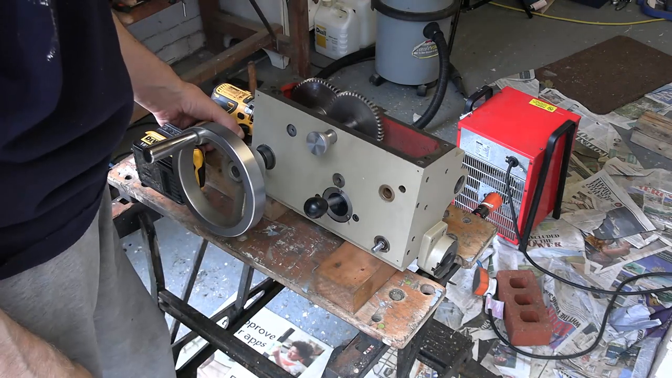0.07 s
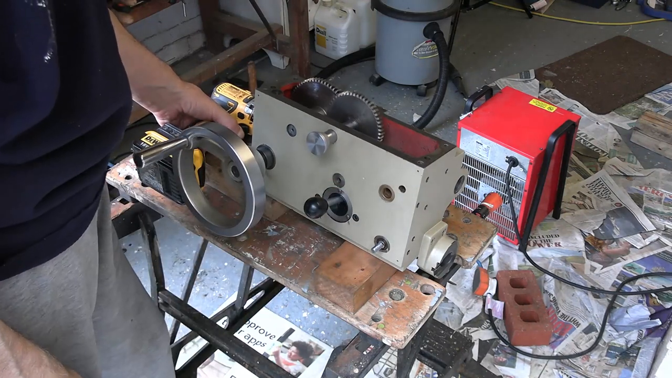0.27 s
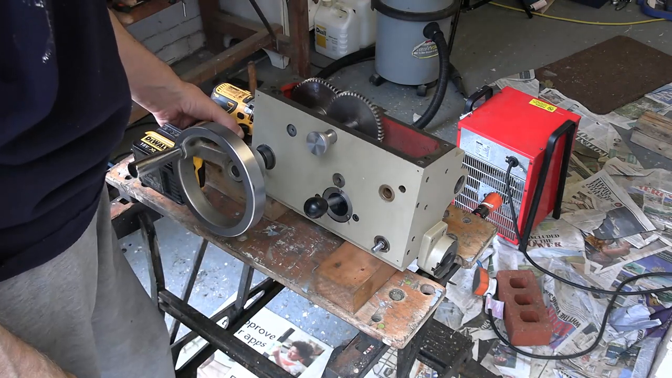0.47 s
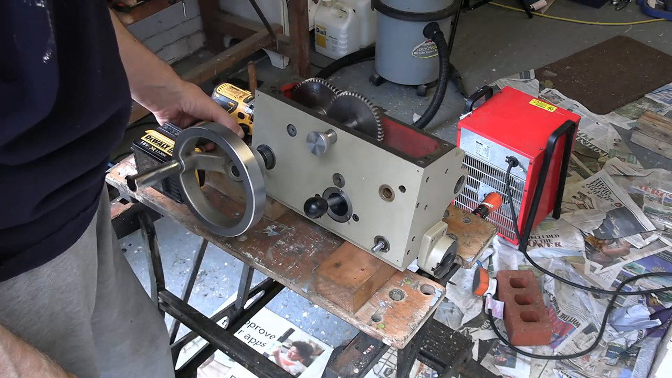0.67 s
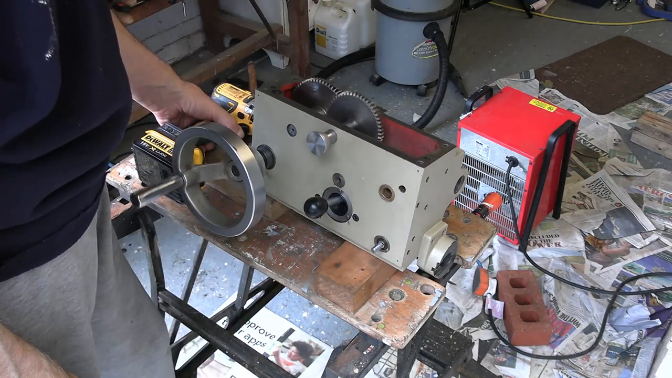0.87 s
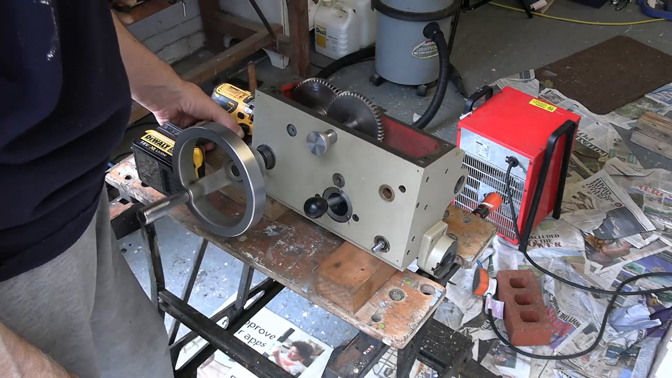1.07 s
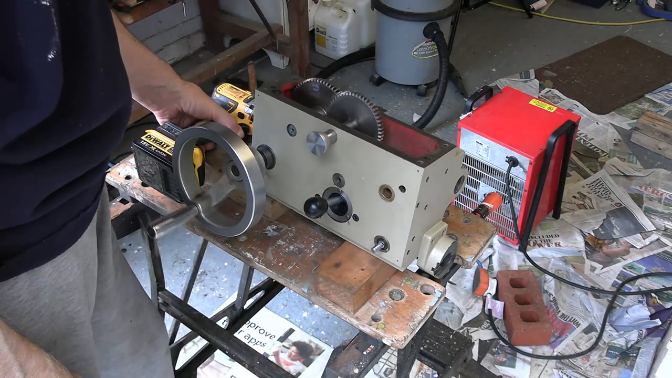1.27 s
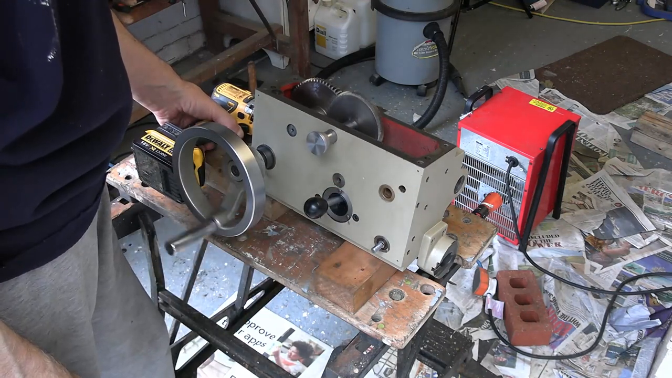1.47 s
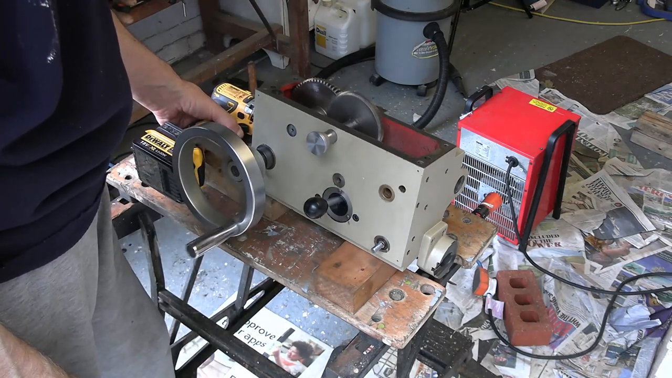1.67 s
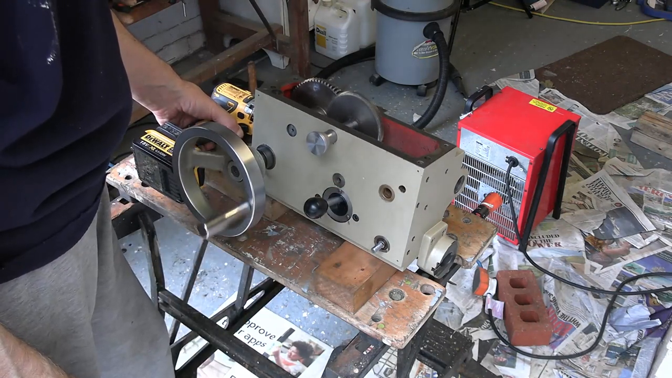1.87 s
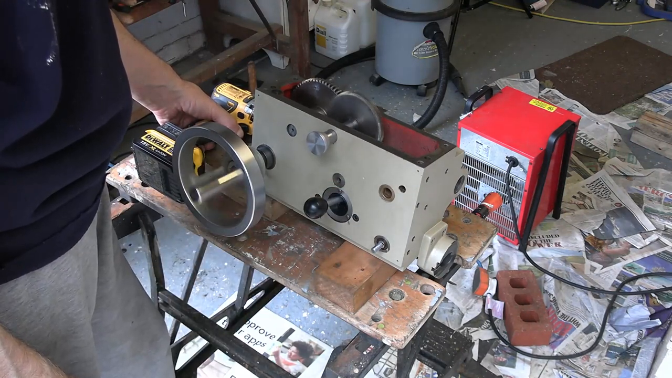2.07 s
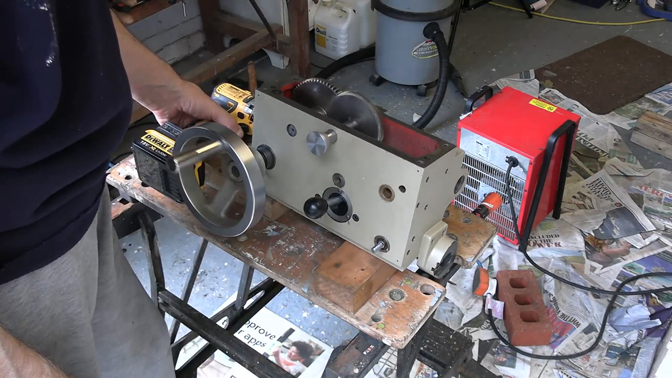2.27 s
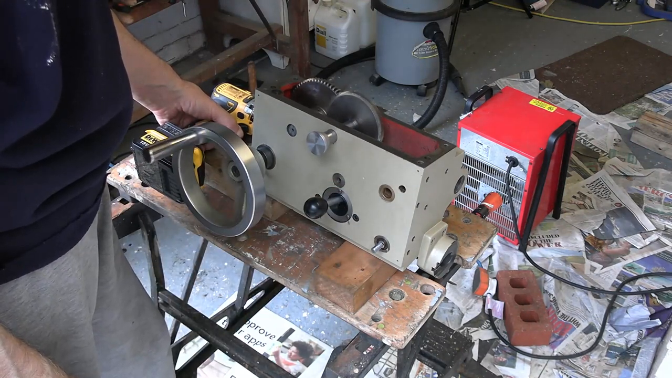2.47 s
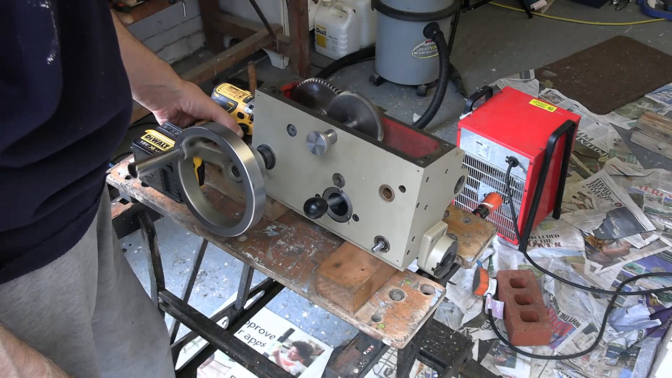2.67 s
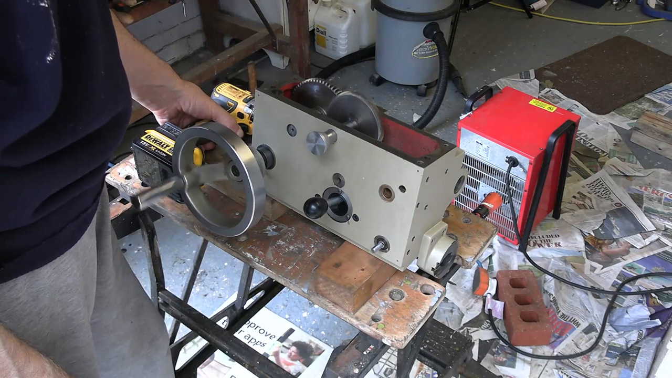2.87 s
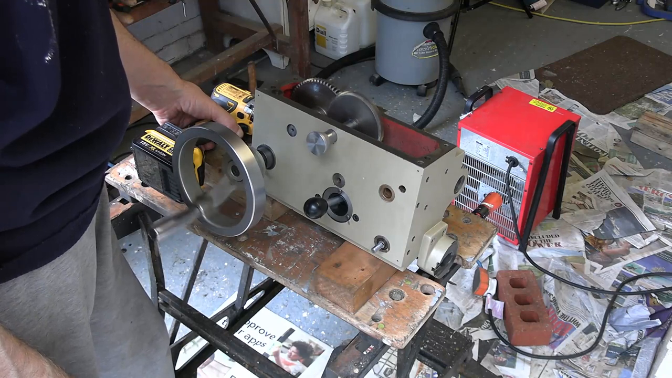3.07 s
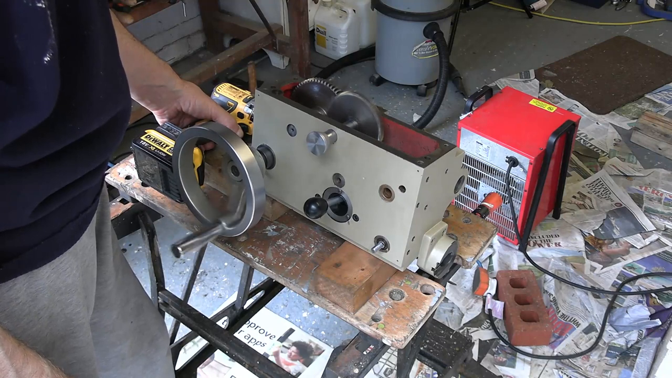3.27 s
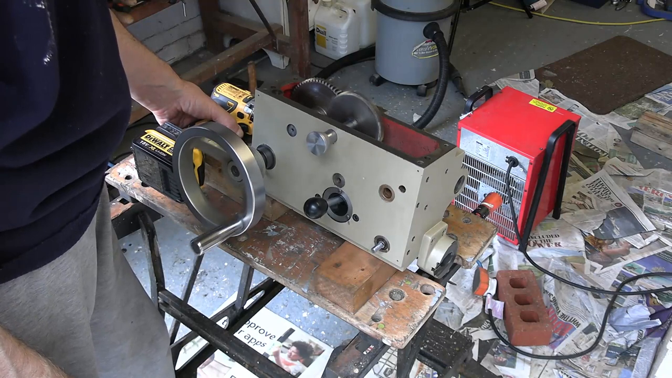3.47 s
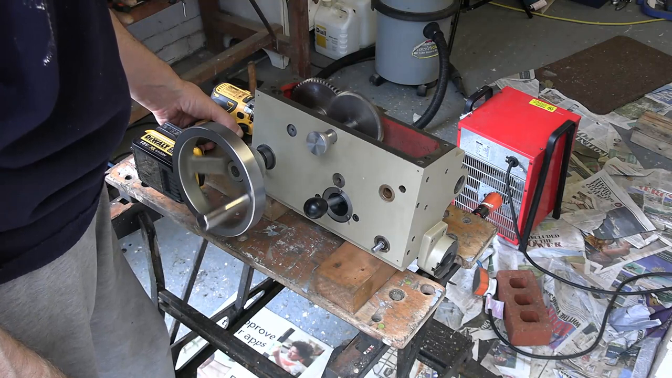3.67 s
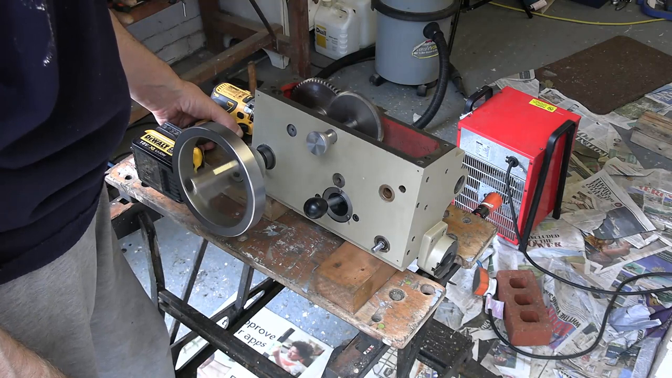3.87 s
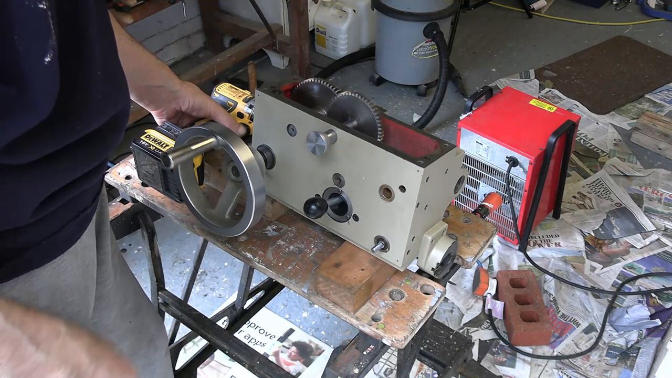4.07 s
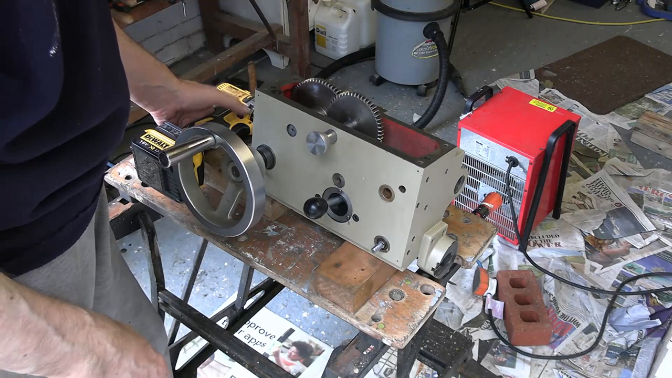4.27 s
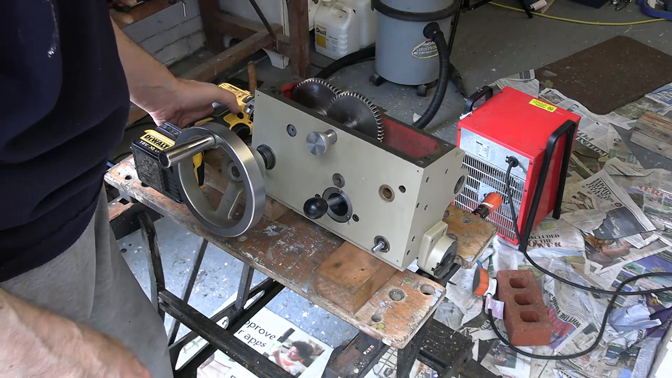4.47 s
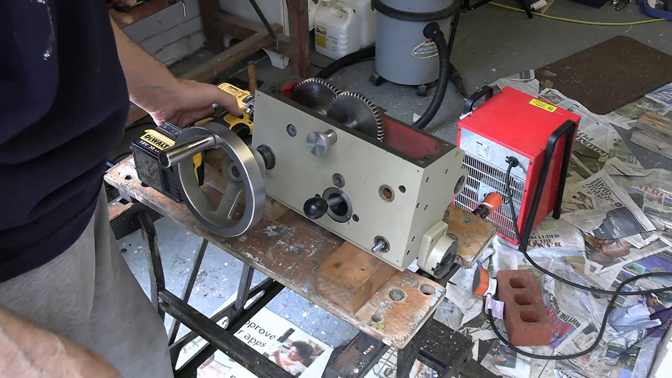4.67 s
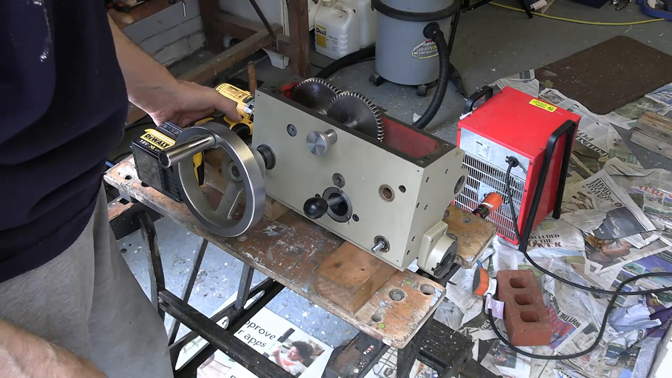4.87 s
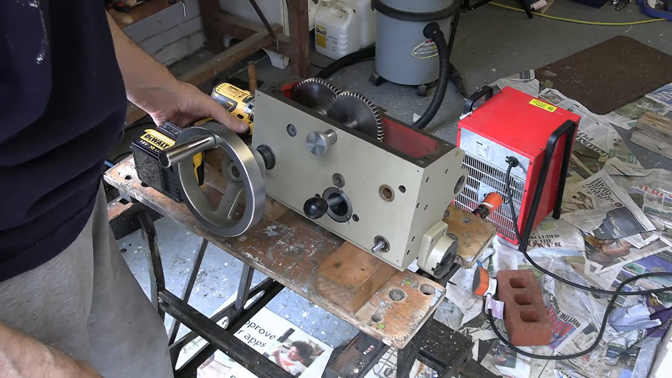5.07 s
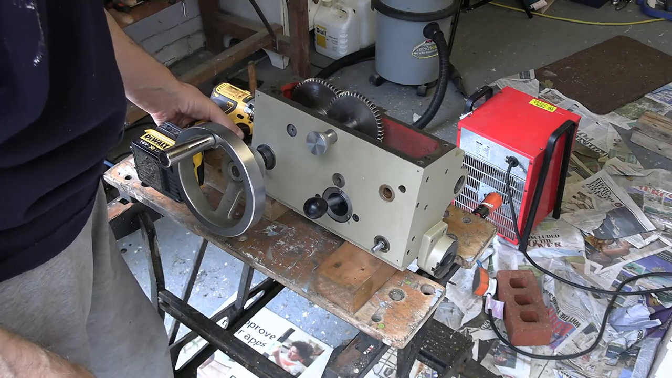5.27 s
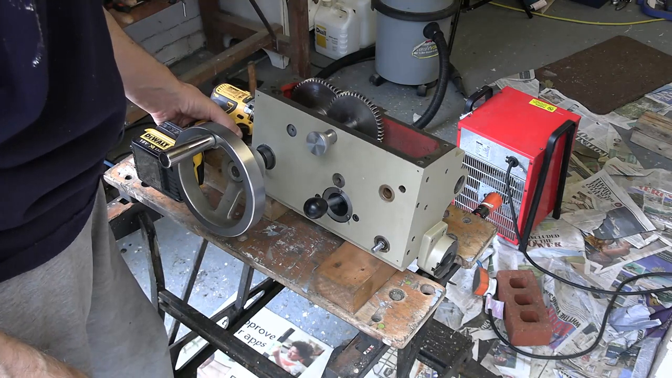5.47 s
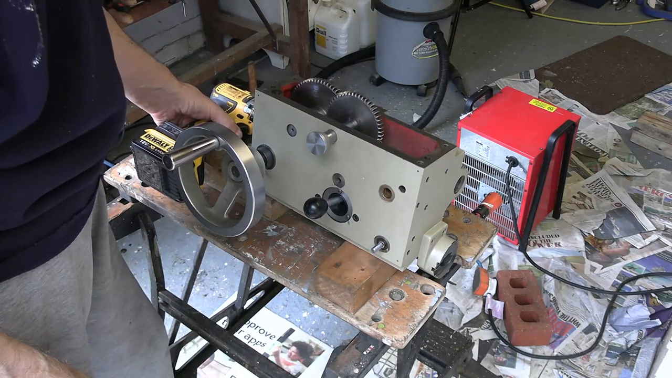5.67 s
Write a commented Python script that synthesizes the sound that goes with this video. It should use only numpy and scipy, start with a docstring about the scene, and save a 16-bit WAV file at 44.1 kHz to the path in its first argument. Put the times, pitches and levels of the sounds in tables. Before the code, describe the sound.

Motor whine and dense rattling gears run slow, then fast, brake to a clacking halt; a switch snaps and the drill starts again.

```python
"""A cordless drill turns the shaft of an open steel gearbox on a workshop bench, first slowly, then at twice the speed.
Random tooth impacts, filtered by case resonances, make the clatter; rotor-locked sines make the whine above it.
The motor brakes and the gears knock as noise bursts with ringing wheel modes; then a switch on the drill clicks.
The drill starts again, and further knocks take up the play of the gears.
A dull hush of filtered noise lies under it all, and a small room rings faintly around the machine."""
import sys
import numpy as np
from scipy import signal
from scipy.fft import rfft, irfft, next_fast_len
from scipy.io import wavfile
from scipy.ndimage import uniform_filter1d

SR = 44100
rng = np.random.default_rng(int(sys.argv[2]) if len(sys.argv) > 2 else 0)


def dump(signal):
    """Clip the signal to [-1, 1] and save it as 16-bit WAV at the path in sys.argv[1]."""
    limited = np.clip(np.atleast_2d(signal).T, -1, 1)
    pcm = np.round(limited * 32767).astype(np.int16)
    wavfile.write(sys.argv[1], SR, pcm)


N = 252252
TIME = np.arange(N) / SR
# the trigger is let go, the shaft stands still, the trigger is pulled again (s)
RELEASE_S, STOP_S, RESTART_S = 4.085, 4.2, 5.54
# cycles of the whine to a turn of the rotor; its pitch at full speed and on the restart, before wander (Hz)
WHINE_ORDER, FAST_HZ, RESTART_HZ = 8, 3246, 1410
# All levels in dB are relative; the scene's mix and gain control come after them.


def from_db(db):
    """Logarithmic level: decibels become an amplitude ratio."""
    return 10 ** (np.asarray(db) / 20)


def rms_one(x):
    """Power normalization: scale to unit mean square."""
    return x / np.sqrt(np.mean(x ** 2) + 1e-20)


def since(s):
    """Elapsed time: seconds gone by after a moment, zero before it."""
    return np.maximum(TIME - s, 0)


def in_time(rows):
    """Linear interpolation: read a curve at every sample."""
    return np.interp(TIME, *np.transpose(rows))


def at_hz(points, hz):
    """Logarithmic frequency axis: read a spectrum between its points."""
    points = np.array(points)
    return np.interp(np.log(np.maximum(hz, 1)), np.log(points[:, 0]), points[:, 1])


def colour(x, spectrum):
    """Linear filtering: multiply by a smooth spectrum, falling away below its first point."""
    size = next_fast_len(len(x) + 4096)
    hz = np.arange(size // 2 + 1) * SR / size
    rumble_cut = np.minimum(hz / spectrum[0][0], 1) ** 2
    gain = from_db(at_hz(spectrum, hz)) * rumble_cut
    return irfft(rfft(x, size) * gain, size)[:len(x)]


def drift(rate_hz):
    """Low-passed noise: slow chance of spread 1, from two equal poles at rate_hz."""
    step = 40  # samples between drawn values
    r = np.exp(-2 * np.pi * rate_hz * step / SR)
    noise = rng.standard_normal(N // step + 2002)
    slow = signal.lfilter([1], [1, -2 * r, r * r], noise)[2000:]
    return np.interp(np.arange(N) / step, np.arange(len(slow)), rms_one(slow))


def resonate(x, hz, width_hz):
    """Damped oscillator: a resonance with gain 1 at its peak."""
    r = np.exp(-np.pi * width_hz / SR)
    zeros = np.array([1, 0, -1]) * (1 - r * r) / 2
    poles = [1, -2 * r * np.cos(2 * np.pi * hz / SR), r * r]
    return signal.lfilter(zeros, poles, x + 1e-18)


def near_reflections(x, t60_s=0.041):
    """Early scattering: case walls and bench spread each impact briefly, which ripples the spectrum."""
    t = TIME[:SR // 20]
    scatter = rng.standard_normal(len(t)) * from_db(-60 * t / t60_s) * (t > .001)
    return signal.fftconvolve(x, scatter / np.linalg.norm(scatter))[:N]


# Decay of the room; columns: pitch_hz [Hz], t60_s [s]
ROOM_DECAY = [(200, 0.1), (800, 0.33), (2000, 0.35), (5000, 0.34), (9000, 0.29)]


def room_tail(x, gap_s=.012):
    """Diffuse reverberation: dense reflections die exponentially, band by band."""
    t, tail = TIME[:SR // 2], 0
    edges = np.geomspace(80, 12000, 9)
    for low, high in zip(edges, edges[1:]):
        band_pass = signal.butter(2, [low, high], "band", fs=SR, output="sos")
        band = signal.sosfilt(band_pass, rng.standard_normal(len(t)))
        t60_s = at_hz(ROOM_DECAY, np.sqrt(low * high))
        tail = tail + band * from_db(-60 * t / t60_s)
    tail = tail * (t > gap_s)
    # level the tail by its energy over the filled bandwidth
    return signal.fftconvolve(x, tail / np.sqrt(np.sum(tail ** 2) * SR / 2 / edges[-1]))[:N]


# Width of the machine's sound; columns: pitch_hz [Hz], level_db of the side signal [dB]
MACHINE_WIDTH = [(60, -26.5), (200, -24.5), (400, -31.5), (740, -10.5), (1500, -1.5), (4000, 1), (9000, 4)]


def in_room(x, wet_db, side_db):
    """Spatial coherence: two close microphones agree in the bass; reflections part them in the treble."""
    wet = from_db(wet_db)
    mid = x + wet * room_tail(x)
    reflections = near_reflections(x, t60_s=0.06) + wet * 2 * room_tail(x)
    side = from_db(side_db) * colour(reflections, MACHINE_WIDTH)
    return np.array([mid + side, mid - side]) / np.sqrt(1 + wet ** 2)


# Spectrum of the workshop's quiet; columns: pitch_hz [Hz], level_db [dB per Hz]
HUSH_COLOUR = [(25, -24), (60, -8), (110, -3), (180, 0), (300, -3), (450, -1), (750, -5), (1300, -9),
               (2500, -13), (4200, -18), (6500, -23), (8300, -28), (9300, -40)]
# Width of the hush; columns: pitch_hz [Hz], level_db of the side signal [dB]
HUSH_SIDE = [(60, -22.5), (210, -31.5), (740, -6.5), (2610, 1.5), (9170, -9.5)]


def workshop(hush_db=-56):
    """Stationary noise: a steady, dull hush with independent mid and side."""
    def hush():
        return from_db(hush_db) * rms_one(colour(rng.standard_normal(N), HUSH_COLOUR))
    mid = hush()
    side = colour(hush(), HUSH_SIDE)
    return np.array([mid + side, mid - side])


def blows(events, spectrum):
    """Impulsive excitation: each blow is a crack of dense, quickly dying vibration."""
    envelope = 0
    for start_s, level_db, t60_s in events:
        decays = np.clip((TIME - start_s) / max(t60_s, .003), 0, 3)
        envelope = envelope + from_db(level_db - 60 * decays) * (TIME >= start_s)
    noise = rng.standard_normal(N)
    return colour(envelope * noise, spectrum) / np.std(colour(noise, spectrum))


# The switch slides and snaps home; columns: start_s [s], level_db [dB], t60_s [s]
SWITCH_SNAPS = [(4.762, -39.5, 0.018), (4.7895, -23.5, 0.02), (4.7945, -34, 0.02), (4.800, -38, 0.02),
                (4.8078, -21, 0.014), (4.809, -18.5, 0.015), (4.8122, -30, 0.019), (4.8175, -20, 0.018)]
# Spectrum of the switch; columns: pitch_hz [Hz], level_db [dB per Hz]
SNAP_COLOUR = [(120, -48), (200, -22), (450, -8), (920, 2), (1310, -3), (1700, -1), (2490, -4), (3500, -7),
               (4200, -5), (5000, -7), (7700, -9), (9300, -16)]
SWITCH_S = SWITCH_SNAPS[0][0]


def switch_click(switch_db=-8):
    """Snap action: a train of short cracks as the switch moves over."""
    return from_db(switch_db) * blows(SWITCH_SNAPS, SNAP_COLOUR)


# Gear flanks slam together at the stop and the restart; columns: start_s [s], level_db [dB], t60_s [s]
FLANK_KNOCKS = [(4.2042, -13.5, 0.042), (4.208, -20.5, 0.1), (4.212, -20, 0.022), (5.5405, -32, 0.099),
                (5.552, -34, 0.026), (5.5585, -25.5, 0.024), (5.569, -45, 0.018)]
# Spectrum of the knocks; columns: pitch_hz [Hz], level_db [dB per Hz]
FLANK_COLOUR = [(150, -26), (400, -9.5), (750, -4), (1500, -3), (2200, -4), (3000, -5.5), (4000, -6),
                (4700, -19.5), (6300, -15.5), (7600, -27), (9300, -33)]
# Ring of the steel gear wheels; columns: pitch_hz [Hz], level_db added to the knock's [dB], t60_s [s]
WHEEL_RING = [(1787, -32, 0.6), (1840, -29, 0.42), (2159, -33, 0.2), (2584, -36, 0.28), (3042, -40, 0.35)]


def knocks(knock_db=-6):
    """Modal vibration: slamming flanks crack and leave the steel wheels ringing."""
    out = from_db(knock_db) * blows(FLANK_KNOCKS, FLANK_COLOUR)
    for start_s, knock_level_db, _ in FLANK_KNOCKS:
        age = since(start_s)
        for pitch_hz, level_db, t60_s in WHEEL_RING:
            decay = from_db(knock_level_db + level_db - 60 * age / t60_s)
            out = out + rng.choice([-1, 1]) * decay * np.sin(2 * np.pi * pitch_hz * age)
    return out


def braking_s():
    """Braking time: seconds spent braking, held once the shaft stands."""
    return since(RELEASE_S) - since(STOP_S)


# Whine pitch as the trigger is squeezed further; columns: time_s [s], pitch_hz before wander [Hz]
TRIGGER_SQUEEZE = [(1.415, 1601), (1.421, 1830), (1.432, 2150), (1.45, 2450), (1.48, 2680), (1.515, 2930),
                   (1.54, 3100), (1.575, 3195), (1.7, 3246)]


def whine_pitch(wander=0.001525, brake_hz_per_s=4100, restart_time_constant_s=0.021):
    """Rotor inertia: pitch follows the trigger, falls evenly under the brake and nears its goal on restart."""
    first = in_time(TRIGGER_SQUEEZE) - brake_hz_per_s * braking_s()
    again = RESTART_HZ * (1 - np.exp(-since(RESTART_S) / restart_time_constant_s))
    # the floor keeps the pitch above zero through the silence
    pitch = np.maximum(np.where(TIME < SWITCH_S, first, again), RESTART_HZ / 2)
    return pitch * (1 + wander * drift(4.01))


def straining(rotor_hz):
    """Torque reaction: strain from 0 to 1 with the square root of the rotor's acceleration."""
    acceleration = uniform_filter1d(np.gradient(rotor_hz), size=500)
    speeding_up = np.maximum(acceleration, 0) * (TIME < RELEASE_S)
    return np.sqrt(speeding_up / speeding_up.max())


RUN_OUT_DB_PER_S = 251  # fall of rattle and whine once the shaft stands


def running(rotor_hz, full_speed_db=-29, db_per_octave=6.5, strain_db=2.5, brake_db_per_s=26, restart_db=-10.5):
    """Impact power: clatter grows with speed and strain, eases under the brake and dies at the stop."""
    octaves = np.log2(rotor_hz * WHINE_ORDER / FAST_HZ)
    db = full_speed_db + db_per_octave * octaves + strain_db * straining(rotor_hz)
    first = from_db(db - brake_db_per_s * braking_s() - RUN_OUT_DB_PER_S * since(STOP_S))
    return np.where(TIME < RESTART_S, first, from_db(db + restart_db))


# rotor turns to a turn of the shaft, teeth on its pinion, and a moment (s) at which its tight spot passes
REDUCTION, PINION_TEETH, TIGHT_SPOT_S = 24.15, 15, .508


def tooth_impacts(rotor_hz, per_turn=12, spread_db=1.0, rub=0.36, swing=0.047, tight_db=0.5, surge_db=0.28):
    """Gear meshing: uneven ticks over flank friction, harder at each engagement and one tight spot."""
    sizes = from_db(spread_db * np.minimum(rng.exponential(1, N), 4.5)) * rng.choice([-1, 1], N)
    struck = rng.random(N) < per_turn * rotor_hz / SR
    # dividing by the root of the speed keeps the power even
    ticks = rms_one(sizes * struck / np.sqrt(rotor_hz))
    shaft = 2 * np.pi * np.cumsum(rotor_hz) / SR / REDUCTION
    shaft = shaft - np.interp(TIGHT_SPOT_S, TIME, shaft)
    engagement = 1 + swing * np.cos(PINION_TEETH * shaft)
    tight = np.cos(shaft / 2) ** 20  # once per shaft turn
    load = engagement * from_db(tight_db * tight + surge_db * drift(34))
    return rms_one((ticks + rub * rng.standard_normal(N)) * load)


def turning_reflections(x, count=4, shifts_hz=5):
    """Time-varying interference: turning wheels change the paths out of the case, so the ripple moves."""
    shares = np.array([drift(shifts_hz) for _ in range(count)])
    shares = shares / np.linalg.norm(shares, axis=0)
    return sum(near_reflections(x * share) for share in shares)


# Spectra of the clatter when slow, fast and restarted; columns: pitch_hz [Hz], level_db [dB per Hz]
SLOW_CLATTER = [(100, -56.5), (300, -16.5), (500, -12.5), (750, -2.5), (920, -2), (1250, -1), (1500, 1),
                (2250, -3.5), (3050, 1), (3400, -1.5), (4000, 0.5), (4800, -5.5), (5050, -5.5),
                (6350, -8.5), (6700, -13), (8050, -10), (9300, -29)]
FAST_CLATTER = [(47, -52), (80, -53.5), (200, -22), (356, -22.5), (426, -13), (646, -8.5), (789, -2.5),
                (871, -5.5), (1270, -5), (1580, -4), (2450, -4.5), (3180, 1), (6370, -10), (8250, -13.5),
                (9300, -27), (12100, -61.5), (20500, -120)]
RESTART_CLATTER = [(100, -13), (450, -8), (900, 2.5), (1450, 4), (2300, -2.5), (3300, -3.5), (4000, -4),
                   (5100, -12), (6100, -14), (7000, -17), (9300, -32)]
# Resonances of the gear case and dips between them; columns: pitch_hz [Hz], width_hz [Hz], level_db [dB]
CASE_MODES = [(1262, 145, -5), (1560, 87, 2.5), (2115, 57, -5.5), (2393, 74, -5), (2648, 46, -7),
              (3025, 70, 1), (3370, 350, -2.5), (4660, 150, 3), (5030, 200, -4), (6140, 300, 3.5),
              (6480, 460, -2.5)]
# Single teeth clack out of the clatter; columns: start_s [s], level_db before clack_db [dB]
TOOTH_CLACKS = [(0.506, -20.5), (0.627, -22), (0.746, -20), (0.868, -24), (0.936, -27), (1.474, -20),
                (1.517, -15), (1.604, -18), (1.719, -14), (1.846, -16), (2.234, -16), (2.941, -14),
                (3.567, -13), (3.801, -16)]


def gears(rotor_hz, fast, slow_db=1.12, fast_db=0.44, restart_db=3.0, scatter_db=-6,
          clack_db=-13, clack_t60_s=.035):
    """Forced resonance: tooth impacts ring the gear case, and the colour follows the speed."""
    body = tooth_impacts(rotor_hz)
    body = body + from_db(scatter_db) * turning_reflections(body)
    for pitch_hz, width_hz, level_db in CASE_MODES:
        body = body + (from_db(level_db) - 1) * resonate(body, pitch_hz, width_hz)
    slow_run = from_db(slow_db) * rms_one(colour(body, SLOW_CLATTER))
    fast_run = from_db(fast_db) * rms_one(colour(body, FAST_CLATTER))
    restart = from_db(restart_db) * rms_one(colour(body, RESTART_CLATTER))
    clatter = np.where(TIME < SWITCH_S, (1 - fast) * slow_run + fast * fast_run, restart)
    events = [(start_s, level_db + clack_db, clack_t60_s) for start_s, level_db in TOOTH_CLACKS]
    return blows(events, FAST_CLATTER) + running(rotor_hz) * clatter


# Level of the whine at low and at full speed, before its gains; columns: time_s [s], level_db [dB]
LOW_SPEED_WHINE = [(0.0, -30.5), (0.03, -41.5), (0.094, -28), (0.156, -43), (0.2, -32), (0.242, -28.5),
                   (0.274, -40), (0.368, -39.5), (0.388, -30.5), (0.416, -31.5), (0.454, -49.5),
                   (0.51, -34.5), (0.55, -33.5), (0.608, -54), (0.632, -31), (0.73, -52), (0.75, -33.5),
                   (0.86, -36), (0.878, -27.5), (0.926, -37.5), (1.024, -33), (1.048, -38.5),
                   (1.138, -29.5), (1.178, -37.5), (1.252, -31), (1.41, -33)]
FULL_SPEED_WHINE = [(1.55, -35.5), (1.59, -35), (1.71, -46), (1.83, -34.5), (1.9, -46), (1.92, -36),
                    (2.11, -43.5), (2.14, -59), (2.35, -35.5), (2.37, -39), (2.72, -43.5), (2.74, -50),
                    (2.78, -46), (4.08, -38)]
STRAIN_FLUTTER_DB = 4.5  # spread of the level at full strain
# the rising whine flares as it crosses a resonance of the case
FLARE_HZ, FLARE_WIDTH_HZ, FLARE_DB = 2975, 90, 8


def whine_strength(rotor_hz, fast, strain, slow_gain_db=-0.45, fast_gain_db=1.5, restart_db=-55,
                   brake_db_per_s=45, strain_loss_db=10):
    """Resonant transmission: the whine stutters when slow, flares rising, swells and sinks, and fades braking."""
    detuning = (rotor_hz * WHINE_ORDER - FLARE_HZ) / FLARE_WIDTH_HZ
    flare = np.exp(-detuning ** 2) * (TIME < RELEASE_S)
    slow = in_time(LOW_SPEED_WHINE) + slow_gain_db
    full = in_time(FULL_SPEED_WHINE) + fast_gain_db
    db = (1 - fast) * slow + fast * full + FLARE_DB * flare
    db = db - brake_db_per_s * braking_s() - RUN_OUT_DB_PER_S * since(STOP_S)
    # under strain the whine weakens and breaks up
    db = db + strain * (STRAIN_FLUTTER_DB * drift(120) - strain_loss_db)
    return from_db(np.where(TIME < RESTART_S, db, restart_db))


# Tones of motor and reduction gear; columns: order [cycles per rotor turn], slow_level_db [dB], fast_level_db [dB]
MESH_TONES = [(1.837, -80, -50), (1.945, -78, -48), (2.008, -76, -46), (2.483, -78, -53.5),
              (3.98, -68, -46.5), (5.32, -69, -53), (5.98, -51.5, -61), (7.38, -56.5, -51.5),
              (12.3, -67, -54.5), (16.04, -46, -50), (23.96, -44, -60), (31.52, -53, -88)]


def motor(rotor_hz, fast, wobble=.0015, fade_db=2.5, whine_flutter_db=1.7, flutter_db=3.0, smear=0.26,
          full_load_db=-36, octave_db=-32, judder=.02):
    """Order locking: the whine and lesser mesh tones follow the rotor's angle and flutter in level."""
    strain = straining(rotor_hz)
    unsteady = 1 + wobble * drift(27.5) + judder * strain * drift(140)
    angle = 2 * np.pi * np.cumsum(rotor_hz * unsteady) / SR
    whine = rms_one(np.sin(WHINE_ORDER * angle) * from_db(whine_flutter_db * drift(42)))
    whine = whine_strength(rotor_hz, fast, strain) * whine
    # hard contact brings out the octave of the whine
    octave = rms_one(np.sin(2 * WHINE_ORDER * angle) * from_db(STRAIN_FLUTTER_DB * drift(120)))
    tones = from_db(octave_db) * strain ** 1.5 * octave
    for order, slow_level_db, fast_level_db in MESH_TONES:
        # play between the teeth blurs the high tones most
        phase = order * angle + smear * np.sqrt(order) * drift(15.7)
        flutter = from_db(flutter_db * drift(31.0) + fade_db * drift(4.9))
        level = from_db(slow_level_db + fast * (fast_level_db - slow_level_db))
        tones = tones + rms_one(np.sin(phase) * flutter) * level
    load = np.minimum(running(rotor_hz) / from_db(full_load_db), 1) ** 2
    return whine + load * tones


def scene(slow_hz=1650, fast_hz=3100, drill_db=5.0, hits_db=4.0):
    """Superposition: rotor speed drives whine and clatter; knocks and clicks fall around the pause."""
    whine_hz = whine_pitch()
    rotor_hz = whine_hz / WHINE_ORDER
    fast = np.clip((whine_hz - slow_hz) / (fast_hz - slow_hz), 0, 1)  # 0 slow, 1 fast
    hits = in_room(knocks() + switch_click(), wet_db=-8.5, side_db=-11.0)
    clatter = in_room(gears(rotor_hz, fast), wet_db=-9.5, side_db=-10.0)
    tones = in_room(motor(rotor_hz, fast), wet_db=-17, side_db=-13.0)
    return workshop() + from_db(hits_db) * hits + from_db(drill_db) * (clatter + tones)


def gain_control(x, knee_db=-50, ratio=0.21, most_db=5.5, release_db_per_s=70, attack_s=0.0034):
    """Dynamic compression: the microphone turns loud sound down fast and recovers at a set rate."""
    pole = np.exp(-1 / (attack_s * SR))
    power = signal.lfilter([1 - pole], [1, -pole], np.mean(x ** 2, axis=0))
    level_db = 10 * np.log10(power + 1e-12)
    wanted_db = np.clip(ratio * (level_db - knee_db), 0, most_db)
    recovery_db = release_db_per_s * TIME
    held_db = np.maximum.accumulate(wanted_db + recovery_db) - recovery_db
    return x * from_db(-held_db)


def record(dry, cutoff_hz=9350):
    """Band limiting: after gain control, an elliptic low-pass cuts the top steeply."""
    low_pass = signal.ellip(12, .2, 80, cutoff_hz, fs=SR, output="sos")
    return signal.sosfilt(low_pass, gain_control(dry))


dry = scene()
out = record(dry)
dump(out)
```